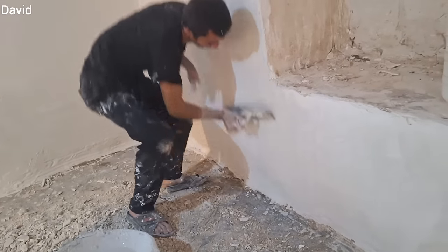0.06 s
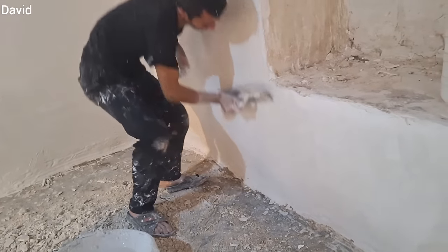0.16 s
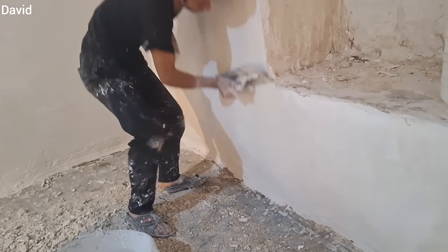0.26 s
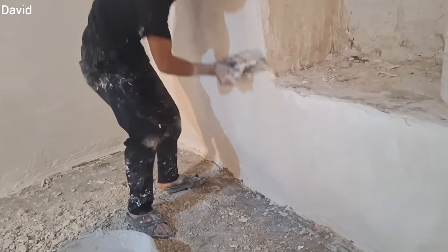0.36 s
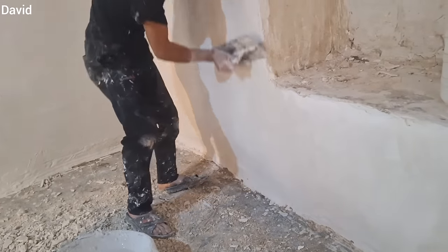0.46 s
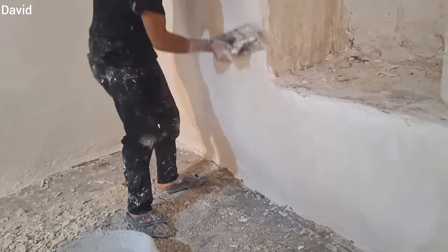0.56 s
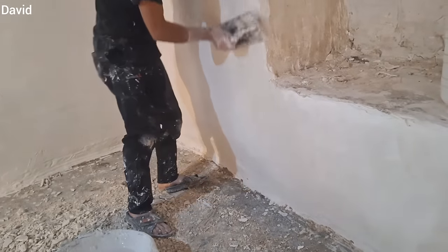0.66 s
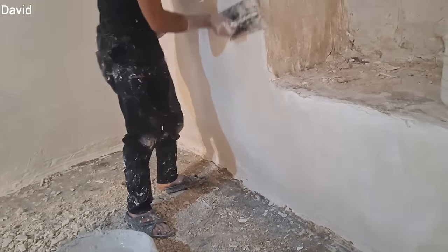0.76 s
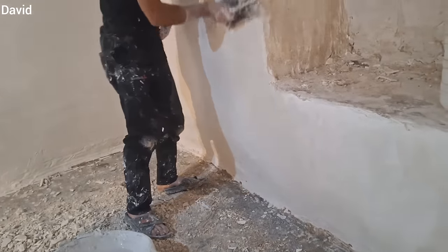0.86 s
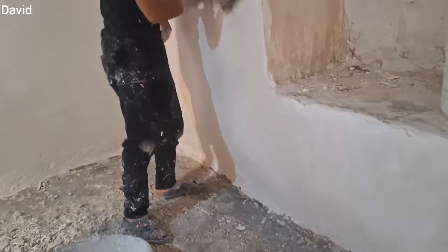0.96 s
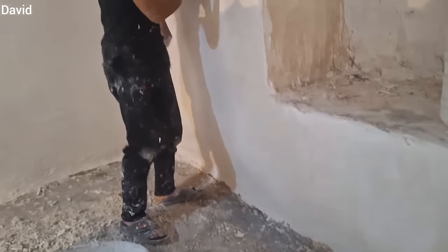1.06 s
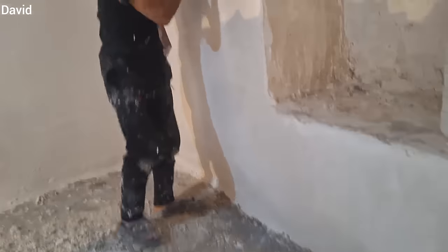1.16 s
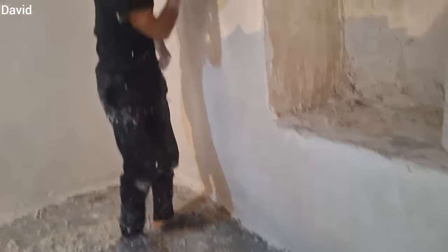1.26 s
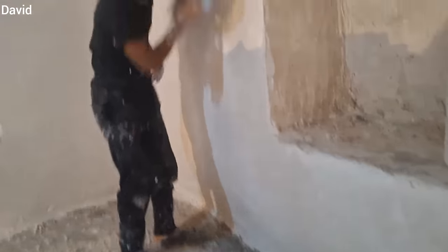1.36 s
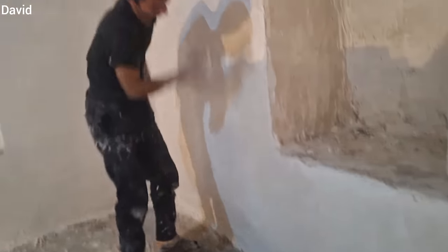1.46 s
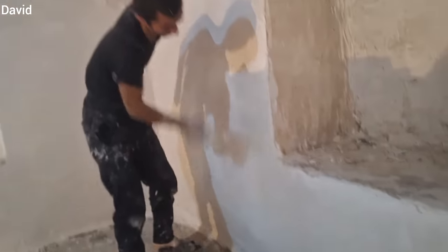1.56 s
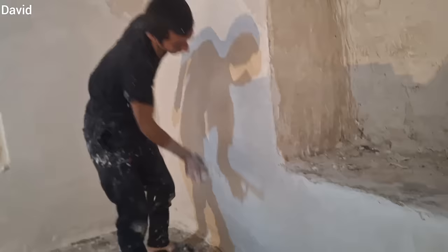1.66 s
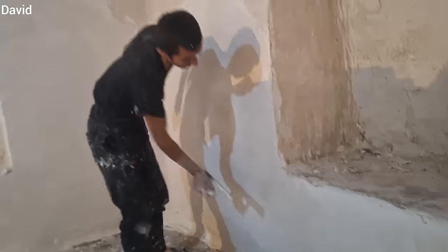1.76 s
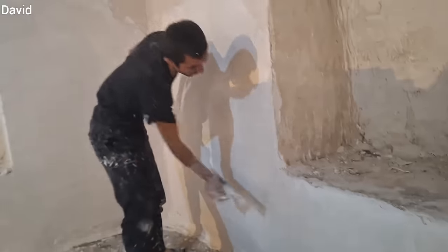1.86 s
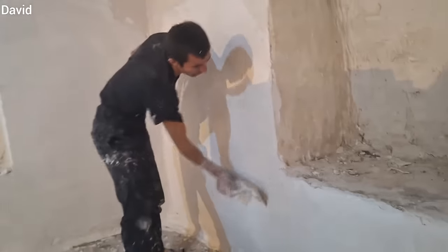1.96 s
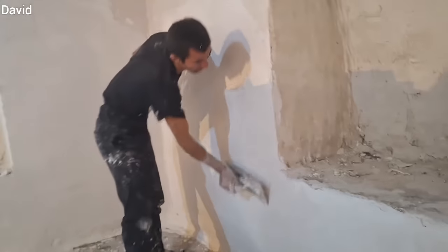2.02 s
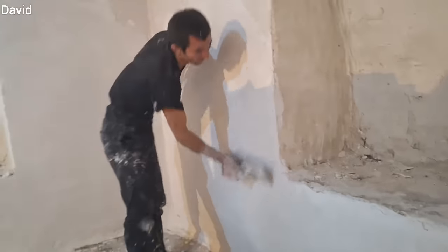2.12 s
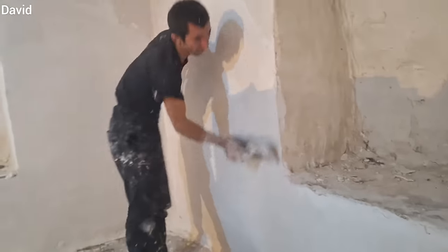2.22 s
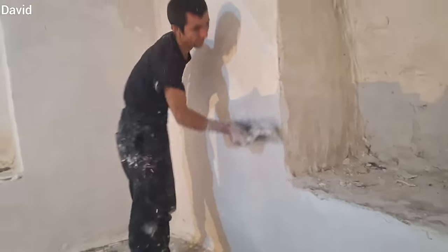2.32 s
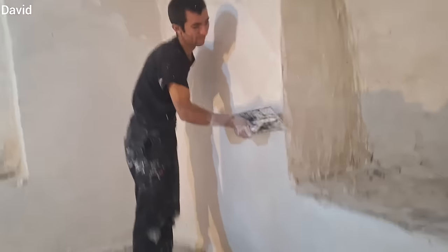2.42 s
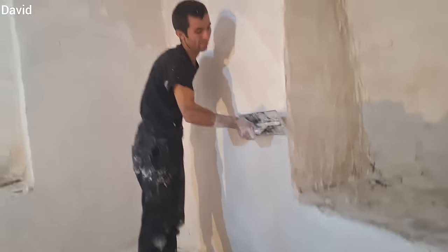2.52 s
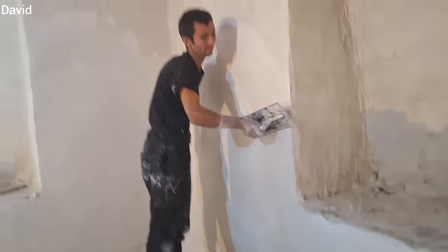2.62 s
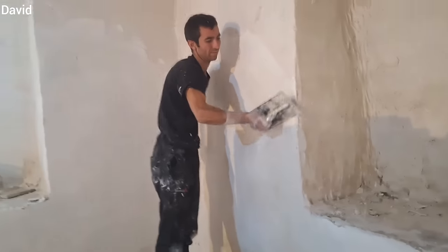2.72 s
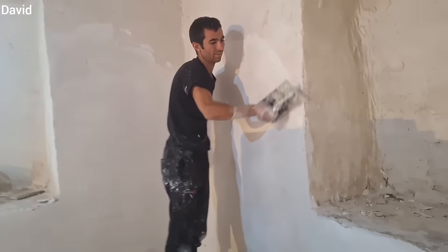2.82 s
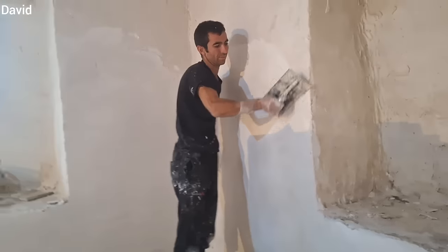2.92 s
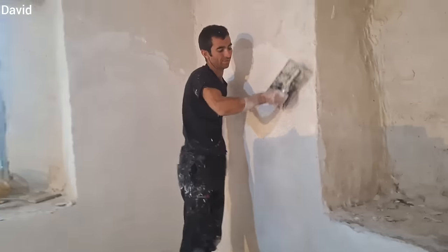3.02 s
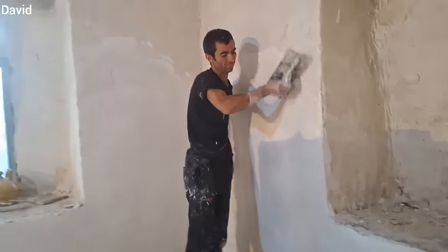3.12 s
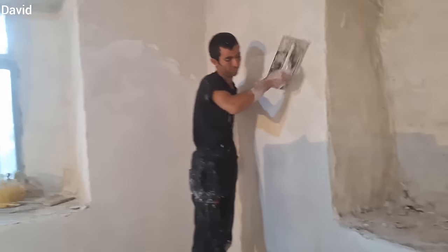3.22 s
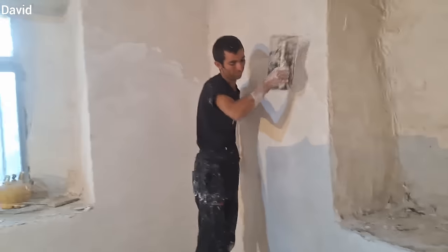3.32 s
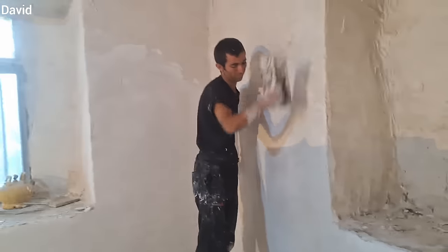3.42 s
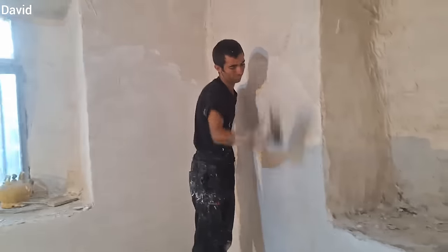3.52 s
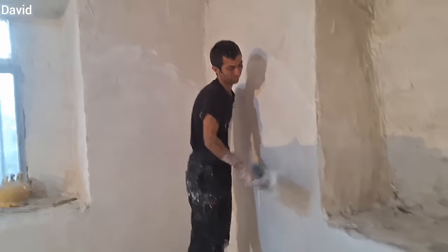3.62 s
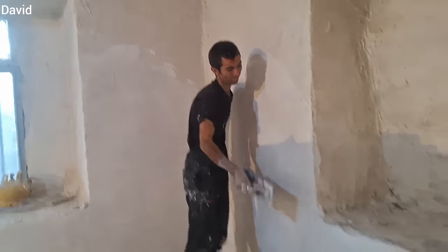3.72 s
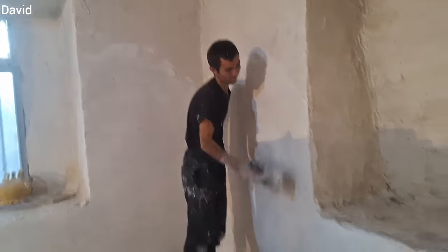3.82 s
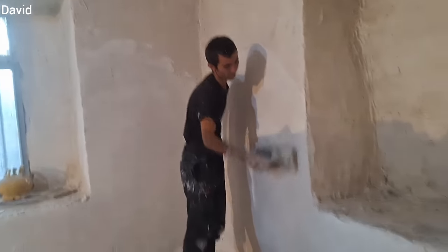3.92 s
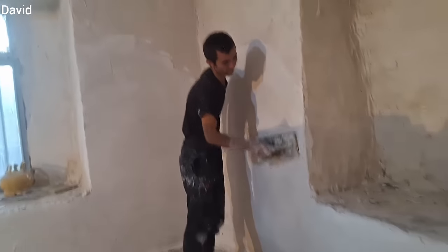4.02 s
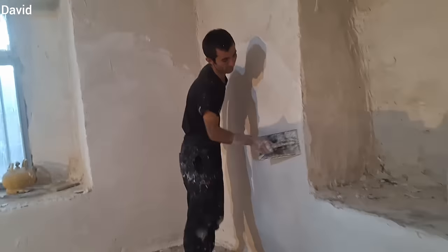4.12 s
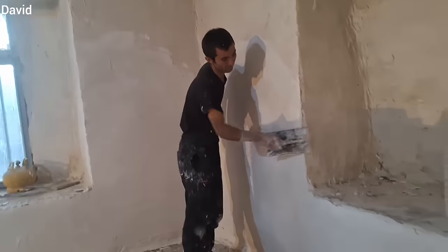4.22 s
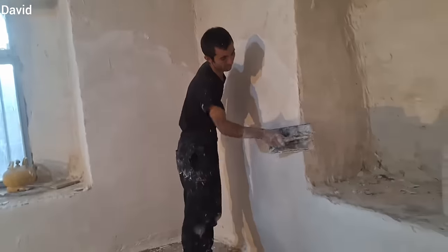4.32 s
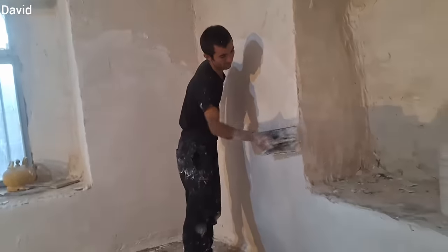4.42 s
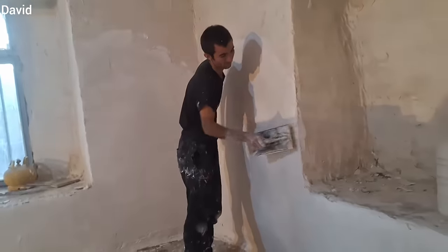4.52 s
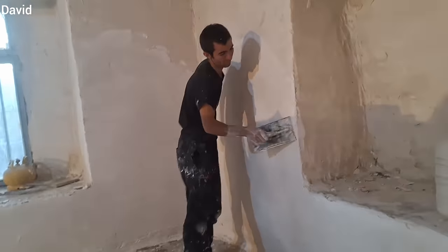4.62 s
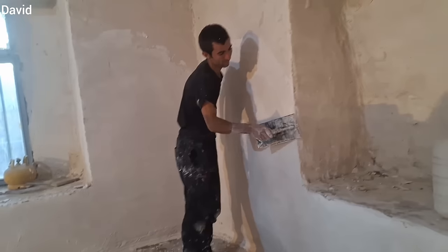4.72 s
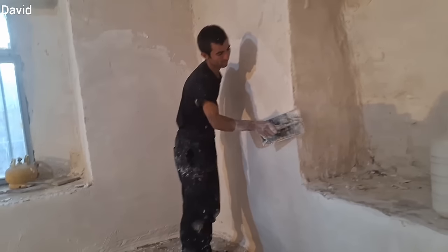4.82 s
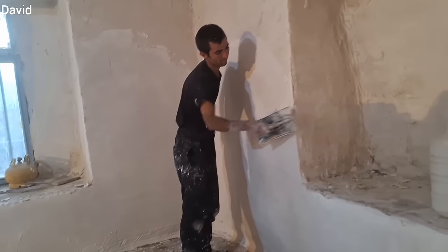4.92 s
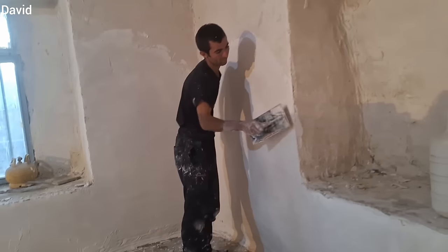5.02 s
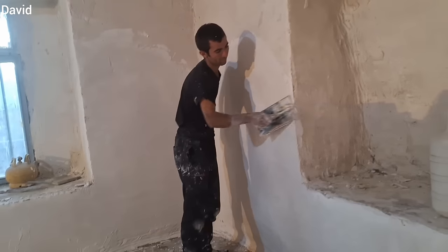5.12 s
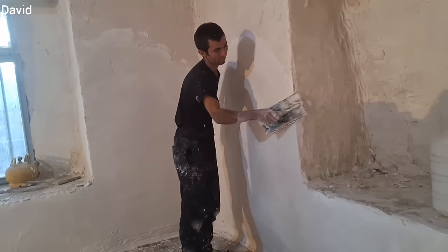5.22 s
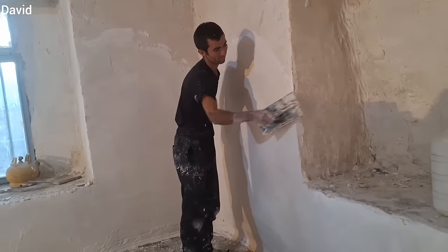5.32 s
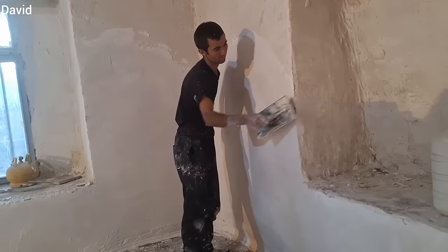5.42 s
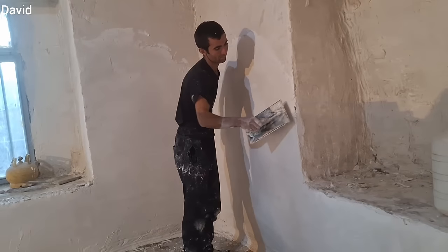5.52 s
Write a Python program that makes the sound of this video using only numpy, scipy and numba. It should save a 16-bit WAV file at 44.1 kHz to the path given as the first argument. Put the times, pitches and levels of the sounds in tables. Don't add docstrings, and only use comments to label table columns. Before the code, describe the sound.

In a bare, hard-walled room, a steel trowel drags gritty plaster upward with a hollow ringing scrape, ending in a loud flick. After a quieter pause with faint brushing and small taps, a second sweep swells to a crest. Short separate dabs and a heavy knock follow, then a dry bright scrape at the end. A nearby handheld phone adds low handling rumble; the room's reflections outweigh the direct sound.

```python
import sys
import numpy as np
from scipy import signal
from scipy.fft import rfft, irfft, next_fast_len
from scipy.io import wavfile
from scipy.ndimage import uniform_filter1d, map_coordinates
from numba import njit

SR = 44100
rng = np.random.default_rng(int(sys.argv[2]) if len(sys.argv) > 2 else 0)


def field_ratio(decibels):
    return 10 ** (np.asarray(decibels, dtype=float) / 20)


def transcribe(signal):
    frames = np.atleast_2d(signal).T
    limited = np.clip(frames, -1, 1)
    pcm = np.round(limited * 32767).astype(np.int16)
    wavfile.write(sys.argv[1], SR, pcm)


N = 245630

# (frequency [Hz], density [dB/Hz])
QUIET = [(15, -42), (25, -26.5), (94, -1.5), (413, -21.5), (1010, -24), (2380, -19), (3480, -35),
         (7010, -13), (8240, -26), (14100, -33), (15700, -33)]
QUIET_DB = -89
# (frequency [Hz], t60 [s])
ROOM_T60 = [(100, 0.78), (300, 0.52), (700, 0.4), (2500, 0.45), (6000, 0.42), (12000, 0.34)]
DENSE_HZ = 2600
# (frequency [Hz], correlation [-1..1])
ALIKE = [(60, 0.64), (130, 0.87), (300, 0.94), (650, 0.4), (900, 0.63), (1150, 0.017)]
# (frequency [Hz], left minus right [dB])
LEAN = [(60, 1.5), (180, -0.5), (550, 0.5), (1650, -5), (4970, -3.5), (15000, -5.5)]
# (frequency [Hz], gain [dB])
PORT = [(7400, 0), (8300, -2), (9300, 4)]
TOP_HZ = 15850
# (time [s], left minus right [dB])
BALANCE = [
    (0.0, 1.5),
    (2.698, 2),
    (3.401, -1),
    (3.701, -7.5),
    (4.299, -0.8),
    (5.57, -1.5),
]
# (time [s], rumble level [dB], fade t60 [s])
SQUEEZES = [(0.0, -65.5, 7.4), (.95, -55, 2), (1.2, -50, 0.55), (1.84, -63.5, 0.84), (2.13, -55, 0.89),
            (2.7, -40.5, 0.99), (3.05, -51.5, 1.22), (3.33, -55.5, 0.57), (4.3, -56, 0.34),
            (4.76, -46.5, 0.84), (5.22, -47, 0.81)]
SQUEEZE_RISE_S, GRIP_REST_DB = 0.28, -90

# (time [s], peak level [dB], pitch [Hz])
THUDS = [
    (0.022, -19, 183),
    (1.72, -75.5, 297),
    (3.674, -74, 327),
    (3.741, -42.5, 330),
    (3.96, -42, 400),
    (4.911, -19.5, 523),
    (5.47, -61, 240),
]
# (time [s], brushing level [dB], fade t60 [s], footfall against brushing [dB])
SKIMS = [(1.357, -52, 1, -17.5), (1.76, -77, .5, -11), (1.846, -66.5, 0.4, -0.5), (3.419, -50, 0.36, -8),
         (3.679, -66, 0.21, -9), (3.97, -81.5, 0.5, 2.5), (4.091, -76, 0.17, 3), (4.53, -69, 0.28, -30),
         (4.675, -64, 0.079, -31), (4.99, -56.5, 0.11, -21), (5.141, -60, 0.12, -18.5),
         (5.521, -69, 0.14, 9)]
SKIM_RISE_S = 0.32
# (frequency [Hz], density [dB/Hz])
BRUSH = [(900, -40), (1500, -10), (2300, 0), (3500, -9), (7300, -10), (8300, -20), (11000, -17), (15500, -24)]
# (frequency [Hz], width [Hz], level [dB])
CORNER = [(5360, 1100, -4), (7000, 630, 4), (10690, 1200, -12.5), (12370, 700, 0), (15500, 600, -6.5)]
ZIP_S, ZIP_DB = 5.526, -45
# (time [s], peak level [dB], low knock [dB], top [dB], crack pitch [Hz])
TAPS = [(1.0025, -25, 8.5, -30.5, 4050), (1.7527, -54, -17, -5, 3000), (1.8048, -48.5, -27, -32, 1424),
        (1.8142, -45.5, -17, -32, 1290), (1.856, -49, 1, -31, 1610), (1.866, -49.5, -7, -20, 2600),
        (1.775, -55.5, -15, -10, 4500), (1.79, -56, -13, -10, 2300), (1.8869, -55, -8.5, 2, 5000),
        (2.0418, -50, -2, -37.5, 2420), (2.061, -29, 16, -41.5, 1750), (1.078, -18.5, 12, -6.5, 1500),
        (4.7, -46, 19, -6, 2250), (2.6261, -36, 25, -24.5, 2150), (4.0748, -57, -4, -31.5, 2730),
        (4.5209, -54.5, -19, -0.5, 7000), (5.1044, -61, -45, 5.5, 2400), (5.1298, -52, -9, 2, 2500),
        (5.5008, -58, -21, 4, 1084), (5.513, -61, -27, 4, 6960), (5.5277, -38.5, -14, -1, 1170),
        (5.5642, -27.5, 6, -23, 1030)]
# (time [s], hold [s], frequency
# [Hz], rms level [dB], fade t60 [s])
SINGS = [(0.189, .08, 712, -42.5, 0.16), (.35, .1, 775, -42, 0.17), (.49, 0.05, 800, -46, 0.12),
         (.48, 0.072, 448, -46.5, 0.17), (0.593, 0.092, 741, -37, .15), (0.755, 0.21, 327.3, -56.5, .15),
         (.755, 0.052, 873, -38, .1), (.87, 0.037, 1077, -49, 0.08), (1.003, 0.0023, 965, -30, 0.017),
         (1.004, 0.0035, 2420, -35.5, 0.039), (1.01, 0.031, 334, -42.5, 0.11),
         (1.078, 0.033, 485, -28, 0.15), (1.084, 0.026, 993, -37.5, 0.14), (1.102, 0.054, 1898, -28.5, .2),
         (1.155, 0.026, 803, -27.5, .15), (2.041, .015, 400, -45, 0.06), (2.042, 0.0031, 2460, -47, .05),
         (2.059, 0.11, 2500, -50.5, .2), (2.201, .1, 439, -40.5, .15), (2.302, 0.035, 737, -30.5, 0.089),
         (2.368, 0.058, 734, -32.5, 0.14), (2.464, 0.078, 743, -32, 0.13), (2.627, 0.0073, 523, -31, 0.03),
         (2.638, .012, 400, -31.5, 0.1), (2.644, 0.0073, 2190, -31, 0.045),
         (2.651, 0.0029, 620, -31.5, 0.036), (2.767, .04, 737, -36, .15), (2.898, 0.048, 2134, -35, 0.14),
         (3.058, .05, 918, -26.5, 0.11), (3.091, 0.022, 261, -30, 0.13), (3.125, 0.063, 793, -25.5, 0.26),
         (3.144, 0.038, 241, -33, 0.22), (3.175, 0.073, 1328, -37.5, 0.44),
         (3.178, 0.083, 2480, -34.5, 0.29), (3.24, 0.021, 899, -32, 0.29), (4.207, 0.018, 887, -45, 0.09),
         (4.225, 0.041, 2450, -45, .3), (4.246, 0.018, 1260, -36, .1), (4.692, .12, 858, -43.5, 0.24),
         (4.911, .006, 610, -54, 0.069),
         (.02, 0.034, 186.7, -37, 0.23), (.55, 0.046, 152.5, -51, 0.21), (.835, 0.021, 803, -38, 0.072),
         (.84, .02, 1076, -40, 0.087), (1.078, .004, 1420, -30, 0.095), (1.87, 0.026, 220, -70, .1),
         (2.05, 0.037, 193, -54, .1), (2.627, 0.034, 316, -37, 0.084), (2.94, 0.11, 590, -35, .15),
         (4.19, 0.022, 426, -66, 0.11), (4.34, 0.025, 424, -56, .1), (4.31, 0.022, 1280, -45, .15),
         (4.345, 0.026, 1480, -52.5, 0.25), (4.695, 0.0079, 443, -56, 0.088), (4.691, .04, 720, -47, .15),
         (4.715, .05, 1250, -49, .15), (4.728, .05, 2300, -49, .2), (5.565, .005, 180, -44, .05),
         (2.883, .05, 1048, -39, .12), (3.001, .04, 257, -38.5, .15), (3.098, .06, 2100, -34, .2),
         (0.774, .03, 710, -44.5, .08), (1.1, .12, 127.4, -50.5, .4), (3.1, .1, 126.6, -46.5, .4),
         (5.158, 0.0092, 400, -47.5, 0.055), (5.165, 0.098, 870, -43.5, .2), (5.2, 0.047, 2435, -43, 0.26),
         (5.46, 0.053, 227, -63, 0.11), (5.564, .005, 446, -44, .05)]
SING_RISE, SING_FLUTTER_DB, SING_DRIFT, SING_ROOM_DB = .2, 4, .012, -10

SPREAD_UP = [(0.0, -32, 740, 400, 2), (.03, -31.5, 724, 385, -0.5), (.07, -34, 740, 394, 3.5),
             (.11, -38.5, 700, 426, -4.5), (.23, -37, 740, 418, 0), (.29, -41, 710, 430, -6),
             (.34, -35.5, 740, 416, -2), (.44, -42, 753, 446, 1.5)]
SPREAD_ON = [(.5, -38, 810, 450, 4), (.57, -45, 730, 400, 2), (.64, -39, 746, 400, 2.3),
             (.72, -43, 854, 342.4, -2), (0.798, -44.5, 860, 329, 7), (.89, -43, 1005, 316.8, 1),
             (.97, -46.5, 940, 317, 5), (1.01, -38, 930, 340, 7), (1.064, -39.5, 970, 382, 5)]
FLICK = [
    (1.072, -29, 890, 470, 13),
    (1.085, -24.5, 957, 470, 5.5),
    (1.129, -23.5, 936, 458, 1),
    (1.173, -28.5, 830, 426, 2.5),
    (1.198, -38.5, 800, 433, 2.5),
]
SWEEP = [(2.043, -58, 863, 409.3, 17.5), (2.127, -45, 865, 435.4, 0.5), (2.196, -32.5, 808, 474, 1.5),
         (2.32, -30.5, 757, 474.6, 2.5), (2.35, -36, 775, 440, -2.5), (2.4, -37, 736, 417, 0.5),
         (2.519, -31.5, 741, 486, 1.5), (2.578, -49, 754, 413, 2.5), (2.62, -49, 799, 426, 2)]
SWEEP_ON = [(2.627, -39, 753, 379.4, 1.8), (2.641, -36, 727, 419.4, 5.5), (2.716, -33.5, 726, 432, 5),
            (2.75, -31.5, 734, 479.6, 4.1), (2.831, -37.5, 730, 425, 5), (2.865, -32, 790, 314.4, 8.6),
            (2.94, -30.5, 791, 286, 4.6), (2.99, -32, 904, 285, 9.5), (3.045, -37, 845, 322.5, 13)]
CREST = [
    (3.077, -26.5, 903, 271.4, 6.5),
    (3.111, -27.5, 902.4, 277.7, 9.9),
    (3.168, -27.5, 844, 259, 6.9),
    (3.201, -28, 857, 255.3, 1.6),
    (3.247, -31, 876, 259, 6),
]
# (landing time [s], landing level [dB], rise to full pressure [s], full level [dB], hold [s])
DABS = [
    (4.189, -56.5, 0.053, -35, 0.01),
    (4.692, -52, 0.027, -38.5, 0.1),
    (5.159, -42, 0.037, -33.5, 0.022),
    (5.531, -71.5, 0.039, -49, .01),
]
DAB_HZ, DAB_FLAP_HZ, FLAP_SAG = 881.4, 425, 0.92
LIFT_DB, LIFT_S = -13.5, 0.069
LANDING_TILT_DB, HOLD_TILT_DB, DAB_TILT_PER_DB = 4.5, 3, 1.1
DAB_HISS_DB, DAB_WALL_DB, DROOP_DB_PER_S = -6, -3, -50.5

# (multiple of the main mode, width [Hz], level [dB])
BLADE = [(.62, 50, -15.5), (.88, 45, 9.5), (1.002, 55, 16), (1.12, 50, 6.5), (1.22, 50, -3.5),
         (1.302, 56.2, -23), (1.55, 59, -18), (2.401, 87, -3.5), (2.9, 118, -19)]
QUIVER = 0.018
# (time [s], peak level [dB])
CATCHES = [(0.335, -22), (0.502, -19.5), (0.638, -22), (0.761, -16), (0.786, -19), (0.839, -27),
           (0.884, -20.5), (0.933, -36), (1.006, -26.5), (1.079, -18), (1.107, -17), (1.166, -17.5),
           (1.216, -27), (2.313, -33.5), (2.385, -24), (2.474, -25.5), (2.624, -26), (3.154, -15),
           (4.718, -25), (4.732, -19.5), (4.76, -35.5), (4.81, -34.5)]
CATCH_DB, CATCH_RISE_S, CATCH_T60_S = -12, 0.02, 0.061
# (frequency [Hz], density [dB/Hz])
GRIT = [(590, -21), (1000, -4), (1200, -9), (1300, -3.5), (1780, -6.5), (2130, 0), (3200, -10), (4500, -19),
        (5850, -29), (9900, -120)]
# (frequency [Hz], density [dB/Hz])
HISS = [(2060, -35.5), (3500, -6), (4500, 1), (5650, -5), (7260, 1), (8550, -16.5), (11500, -11),
        (13200, -17.5), (15200, -17.5), (15700, -16.5)]
# (frequency [Hz], width [Hz], level [dB])
WALL = [(126.4, 20, -3.5), (183.5, 41, -1.5), (217, 16, 0.5), (232.2, 7, 1), (346, 21, 0), (382, 8, -2.5),
        (434, 150, -1), (601, 13, 3)]
MID_DB, REST_HZ = -32, 755
RING_DB, HISS_DB, HISS_PER_TILT, HISS_PER_DB = -2, 0.33, -0.72, -0.11
WALL_DB, WALL_PER_TILT, WALL_PER_HZ, WALL_PER_DB = -2.5, 0.066, -0.057, 0.35
SLACK_HZ, BOOM_PER_HZ = 400, -0.071


def unit(x):
    return x / np.sqrt(np.mean(x ** 2) + 1e-20)


def along(points, hz):
    f, v = np.transpose(points)
    return np.interp(np.log(hz + 1), np.log(f + 1), v)


def wobble(rate):
    knots = rng.standard_normal(int(N * rate / SR) + 4)
    return map_coordinates(knots, [np.arange(N) * rate / SR])


def filtered(x, response):
    m = next_fast_len(N + 8192)
    return irfft(rfft(x, m) * response(np.fft.rfftfreq(m, 1 / SR)), m)[..., :N]


def band(lo_hz, hi_hz):
    return lambda f: 1 / np.sqrt((1 + (lo_hz / (f + 1)) ** 6) * (1 + (f / hi_hz) ** 6))


def modes(table):
    def response(f):
        total = 0
        for k, (centre, width, db) in enumerate(table):
            damping = 1j * f * width
            total = total + (-1) ** k * field_ratio(db) * damping / (centre * centre - f * f + damping)
        return total
    return response


@njit
def resonate(x, turn, r):
    y = np.zeros(len(x))
    for i in range(2, len(x)):
        drive = (x[i] - x[i - 2]) * np.sqrt(1 - r)
        y[i] = 2 * r * np.cos(turn[i]) * y[i - 1] - r * r * y[i - 2] + drive
    return y


def swells(rows, rise):
    t = np.arange(N) / SR
    return np.array([field_ratio(db - 60 * np.maximum((s - t) / rise, (t - s) / t60)) for s, db, t60, *_ in rows])


def sand(per_second, spread_db, wet):
    chance, sign, size = rng.random((3, N))
    sizes = field_ratio(-spread_db * np.log(size + 0.046))
    grains = (chance < per_second / SR) * np.sign(sign - .5) * sizes
    wet = np.clip(wet, 0, 1)
    return np.sqrt(1 - wet) * unit(grains) + np.sqrt(wet) * rng.standard_normal(N)


def pair(x):
    turn = lambda f: np.arccos(np.clip(along(ALIKE, f), -1, 1)) / 2
    mid, side = filtered(x, lambda f: np.array([np.cos(turn(f)), np.sin(turn(f))]))
    return np.array([mid + side, mid - side])


def room_tone():
    return unit(pair(filtered(rng.standard_normal((2, N)), lambda f: field_ratio(along(QUIET, f)))))


def wash(x):
    hz, t, z = signal.stft(x, SR, nperseg=128)
    t = t[t < .7]
    early = 1 + field_ratio(8 - 60 * t / .03)
    fade = (early * field_ratio(-60 * t / along(ROOM_T60, hz)[:, None])) ** 2
    source = uniform_filter1d(abs(z) ** 2, size=3, axis=0)
    power = signal.fftconvolve(source, fade / fade.sum(1, keepdims=True), axes=1)[:, :z.shape[1]]
    fresh = signal.stft(rng.standard_normal((2, N)), SR, nperseg=128)[2]
    gain = np.sqrt(abs(power) / np.mean(abs(fresh) ** 2))
    return signal.istft(fresh * gain, SR, nperseg=128)[1][:, :N]


def room(x, step=SR // 16):
    size = SR * 2 // 3
    out, fade = np.zeros((2, N + 2 * SR)), np.hanning(2 * step + 1)[:-1]
    x = np.pad(x, (step, 2 * step))
    early = 1 + field_ratio(9 - 60 * np.arange(size) / SR / 0.021)
    for at in range(0, N + step, step):
        hz, t, z = signal.stft(rng.standard_normal((2, size)), SR, nperseg=256)
        decay = field_ratio(-60 * t / along(ROOM_T60, hz)[:, None])
        tail = early * signal.istft(z * decay, SR, nperseg=256)[1][:, :size]
        tail = tail / np.linalg.norm(tail, axis=1, keepdims=True)
        wet = signal.fftconvolve((x[at:at + 2 * step] * fade)[None], tail, axes=1)
        out[:, at:at + wet.shape[1]] += wet[:, :out.shape[1] - at]
    share = lambda f: .3 + .7 / (1 + (f / DENSE_HZ) ** 4)
    distinct = pair(filtered(out[:, step:][:, :N], lambda f: np.sqrt(share(f))))
    return distinct + filtered(wash(x[step:][:N]), lambda f: np.sqrt(1 - share(f)))


def grip():
    rumble = unit(pair(filtered(rng.standard_normal((2, N)), band(45, 130))))
    squeeze = swells(SQUEEZES, SQUEEZE_RISE_S).sum(0) + field_ratio(GRIP_REST_DB)
    return squeeze * field_ratio(3.3 * wobble(24) - 5.0) * rumble


def thuds():
    out, t = np.zeros(N + SR), np.arange(SR // 5) / SR
    for s, db, hz in THUDS:
        dull = unit(signal.lfilter(*signal.iirpeak(hz, 1.1, SR), rng.standard_normal(len(t))))
        out[round(s * SR):][:len(t)] += field_ratio(db - 14.0 - 60 * t / 0.045) * dull
    return filtered(out[:N], band(120, 650))


def skims():
    shapes = swells(SKIMS, SKIM_RISE_S)
    brush = unit(filtered(sand(1500, spread_db=2, wet=.7), lambda f: field_ratio(along(BRUSH, f))))
    feet = unit(filtered(sand(200, spread_db=6, wet=0.94), band(120, 430)))
    feet_gain = field_ratio(np.transpose(SKIMS)[3]) @ shapes
    return field_ratio(1.5 * wobble(25) - 1.5) * (shapes.sum(0) * brush + feet_gain * feet)


def zipping():
    t = np.arange(N) / SR
    shape = np.clip((t - ZIP_S) / .002, 0, 1)
    return field_ratio(ZIP_DB) * shape * unit(filtered(sand(5600, spread_db=6.0, wet=0.78), modes(CORNER)))


def taps():
    crack, tick, knock = np.zeros((3, N + SR))
    t = np.arange(SR // 10) / SR
    for s, db, knock_db, top_db, hz in TAPS:
        noise, at = rng.standard_normal((3, len(t))), round(s * SR)
        coloured = unit(signal.lfilter(*signal.iirpeak(hz, 2.5, SR), noise[0]))
        crack[at:at + len(t)] += field_ratio(db + 1.0 - 60 * t / 0.015) * coloured
        tick[at:at + len(t)] += field_ratio(db + top_db + 5.5 - 60 * t / 0.005) * noise[1]
        knock[at:at + len(t)] += field_ratio(db + knock_db + 2.0 - 60 * t / 0.14) * noise[2]
    bright = filtered(crack[:N], band(770, 5800)) + filtered(tick[:N], band(5400, 15000))
    return bright + filtered(knock[:N], band(320, 1100))


def sings():
    out, t = np.zeros((2, N + SR)), np.arange(SR // 2) / SR
    flutter = field_ratio(SING_FLUTTER_DB * wobble(60))
    drift = 1 + SING_DRIFT * np.pad(wobble(30), (0, SR))
    for s, hold, hz, db, t60 in SINGS:
        at = round(s * SR)
        start, side = rng.random(2)
        rise = np.clip(t / (SING_RISE * hold + .0005), 0, 1)
        shape = rise * field_ratio(db + 4 - 60 * np.maximum(t - hold, 0) / t60)
        apart = np.sign(side - .5) * np.arccos(np.clip(along(ALIKE, hz), -1, 1)) / 2
        phase = 2 * np.pi * (hz * np.cumsum(drift[at:][:len(t)]) / SR + start)
        out[:, at:at + len(t)] += shape * np.sin(phase + np.array([[apart], [-apart]]))
    return flutter * out[:, :N]


def curves(tables, rise, fall):
    rows, pause_s = [], .08
    for k, table in enumerate(tables):
        first, last = table[0], table[-1]
        if k == 0 or first[0] - tables[k - 1][-1][0] > pause_s:
            rows += [(first[0] - rise, -110, *first[2:])]
        rows += table
        if k + 1 == len(tables) or tables[k + 1][0][0] - last[0] > pause_s:
            rows += [(last[0] + fall, -110, *last[2:])]
    s, *cols = np.transpose(sorted(rows))
    return [np.interp(np.arange(N) / SR, s, c) for c in cols]


def stroke():
    low_hz = DAB_FLAP_HZ * FLAP_SAG
    dabs = []
    for s, land_db, rise, db, hold in DABS:
        tilt = HOLD_TILT_DB + DAB_TILT_PER_DB * (db - MID_DB)
        full, end = s + rise, s + rise + hold
        dabs.append([(s, land_db, DAB_HZ, DAB_FLAP_HZ, LANDING_TILT_DB),
                     (full, db, DAB_HZ, DAB_FLAP_HZ, tilt),
                     (end, db + DROOP_DB_PER_S * hold, DAB_HZ, low_hz, tilt),
                     (end + LIFT_S, db + LIFT_DB, DAB_HZ, low_hz, HOLD_TILT_DB)])
    return curves([SPREAD_UP, SPREAD_ON, FLICK, SWEEP, SWEEP_ON, CREST, *dabs], rise=.008, fall=.06)


def blade(push, main_hz):
    ring = np.zeros(N)
    for multiple, width, db in BLADE:
        turn = 2 * np.pi * multiple * main_hz / SR
        ring += field_ratio(db) * resonate(push, turn, np.exp(-np.pi * width / SR))
    return ring


def trowel():
    grit_db, main_hz, flap_hz, tilt_db = stroke()
    over_db = np.clip(grit_db - MID_DB, -15, 15)
    dabbing = np.arange(N) / SR > (CREST[-1][0] + DABS[0][0]) / 2
    ring_db = RING_DB + tilt_db + 0.61 * wobble(24.97)
    hiss_db = HISS_DB + HISS_PER_TILT * tilt_db + HISS_PER_DB * over_db + DAB_HISS_DB * dabbing
    wall_db = WALL_DB + WALL_PER_TILT * tilt_db + WALL_PER_HZ * (main_hz - REST_HZ)
    wall_db = wall_db + WALL_PER_DB * over_db + DAB_WALL_DB * dabbing
    chatter = field_ratio(grit_db + 1.42 * wobble(29.94) + 0.47 * wobble(90))

    grains = sand(4000, spread_db=4.0, wet=0.35)
    grit = unit(filtered(grains, lambda f: field_ratio(along(GRIT, f))))
    hiss = unit(filtered(grains, lambda f: field_ratio(along(HISS, f))))

    lumps = sand(430, spread_db=0.0, wet=0.88)
    flap = unit(resonate(lumps, 2 * np.pi * flap_hz / SR, np.exp(-np.pi * 40 / SR)))
    boom = field_ratio(-1.0 + BOOM_PER_HZ * (flap_hz - SLACK_HZ)) * unit(filtered(lumps, modes(WALL)))
    wall = boom + field_ratio(-3.0) * flap

    main_hz = main_hz * (1 + QUIVER * wobble(35))
    caught = swells([(s, db + CATCH_DB, CATCH_T60_S) for s, db in CATCHES], CATCH_RISE_S).sum(0)
    steady = blade(grains, main_hz).std()
    ring = blade((chatter * field_ratio(ring_db) + caught) * grains, main_hz) / steady
    return ring + chatter * (field_ratio(3.0) * grit + field_ratio(hiss_db - 0.5) * hiss + field_ratio(wall_db - 2.5) * wall)


def scene():
    work = trowel() + taps() + thuds() + skims() + zipping()
    lag = 5 * wobble(2.5)
    t = np.arange(N)
    direct = np.array([np.interp(t - np.round(side * lag), t, work) for side in (1, -1)])
    song = sings()
    near = field_ratio(-14) * direct + song
    answer = room(work + field_ratio(SING_ROOM_DB) * song.mean(0))
    heard = filtered(near + field_ratio(0.5) * answer, band(120, 29000))
    return heard + field_ratio(QUIET_DB + 17.0) * room_tone() + grip()


def band_limit(x):
    return signal.sosfilt(signal.butter(12, 15890, fs=SR, output="sos"), x)


def record(dry):
    s, pan_db = np.transpose(BALANCE)
    balance_db = np.interp(np.arange(N) / SR, s, pan_db)
    halves = [.5, -.5]
    colour = lambda f: field_ratio(np.outer(halves, along(LEAN, f)) + along(PORT, f)) * (f < TOP_HZ)
    mix = filtered(dry, colour) * field_ratio(np.outer(halves, balance_db))
    return band_limit(mix)


dry = scene()
out = record(dry)
transcribe(out)
```